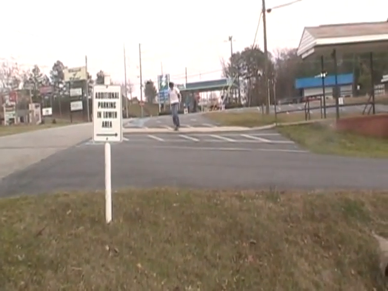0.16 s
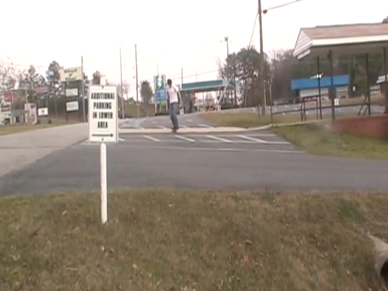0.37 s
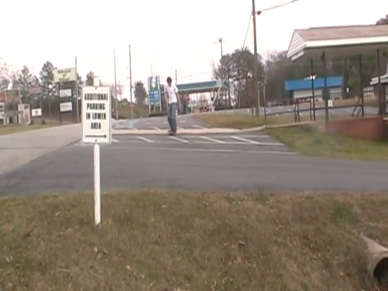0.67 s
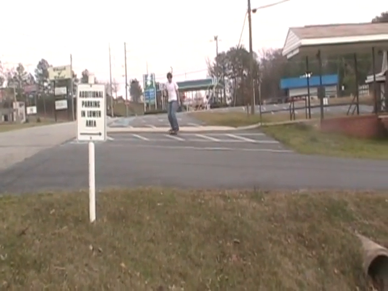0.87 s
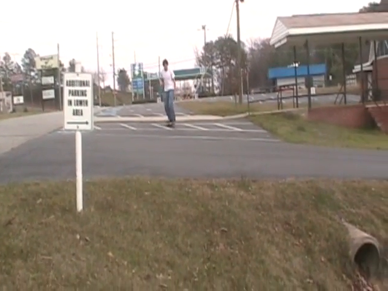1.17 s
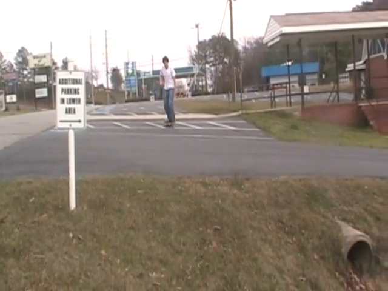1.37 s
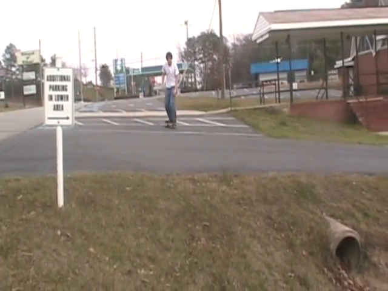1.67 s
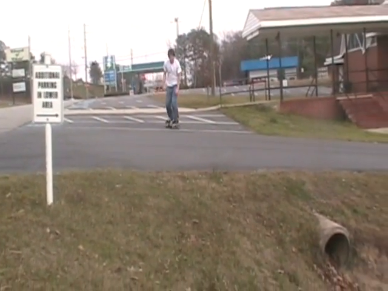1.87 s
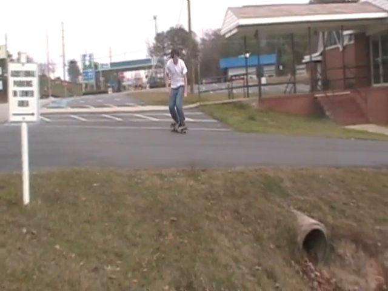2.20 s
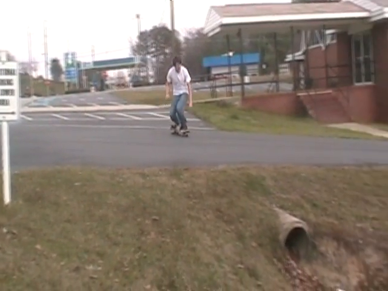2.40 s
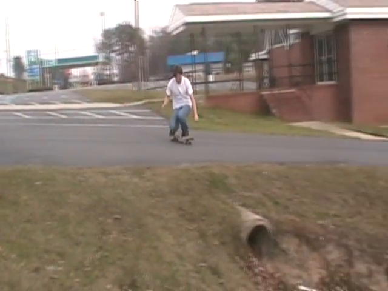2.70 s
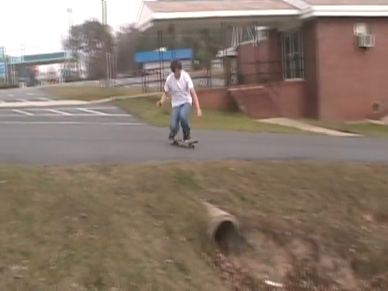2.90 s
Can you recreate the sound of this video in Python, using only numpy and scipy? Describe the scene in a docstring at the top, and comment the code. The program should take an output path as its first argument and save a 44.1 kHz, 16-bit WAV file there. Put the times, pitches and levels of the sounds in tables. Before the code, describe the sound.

A skateboard approaches across an open car park under constant low, lumpy wind buffeting. Sharp clacks come at 0.3 and 0.5 seconds, with a hollow deck knock near 0.56; a faint bird chirps at 0.2. Gritty, metallic rattle swells around 0.8, with treble hiss. Road rumble peaks near 1.8, sparse clacks follow around 1.5, 2.15 and 2.6, and a wavering growl settles lower. A distant engine drones faintly, fading late.

```python
"""In a car park, a skateboard rolls towards the listener: wheels on grit rasp and hiss, then growl on asphalt.
The growl, grit ringing two narrow resonances, shifts between them and settles on the lower as the board turns.
Joints and stones clack as noise bursts through the board's ringing modes, and axle drops knock the deck.
Wind, as lumpy shaped noise, buffets both microphone ports; a far bird chirps once as a gliding sine,
and a distant engine drones underneath as one wavering sine."""
import sys
import numpy as np
from scipy import signal
from scipy.fft import rfft, irfft
from scipy.io import wavfile
from scipy.ndimage import uniform_filter1d

SR = 44100
rng = np.random.default_rng(int(sys.argv[2]) if len(sys.argv) > 2 else 0)


def pcm_store(signal):
    """Save signal as 16-bit PCM."""
    levels = np.round(np.clip(np.atleast_2d(signal), -1, 1) * 32767)
    wavfile.write(sys.argv[1], SR, levels.astype(np.int16).T)


N = 134505
TIME = np.arange(N) / SR  # s
FREQS = np.maximum(np.arange(N // 2 + 1) * SR / N, 1)  # Hz

# grit under the wheels: impacts per second, spread of their sizes in dB
FINE_GRAINS_PER_S, COARSE_GRAINS_PER_S, GRAIN_SPREAD_DB = 3000, 2400, 2


def from_db(db):
    """Decibels to gain."""
    return 10 ** (np.asarray(db) / 20)


def rms_one(x):
    """Scale to unit power."""
    return x / np.sqrt(np.mean(x ** 2) + 1e-20)


def in_time(rows):
    """Each column of a curve, per sample."""
    s, *columns = np.transpose(rows)
    return [np.interp(TIME, s, c) for c in columns]


def in_frequency(rows):
    """Each column of a spectrum, per frequency bin, interpolated along log frequency."""
    hz, *columns = np.transpose(rows)
    return [np.interp(np.log(FREQS), np.log(hz), c) for c in columns]


def colour(x, spectrum, tilt_db=0):
    """Give a signal a spectrum and a tilt in dB per octave; unit power."""
    gain_db = in_frequency(spectrum)[0] + tilt_db * np.log2(FREQS)
    return rms_one(irfft(rfft(x) * from_db(gain_db), N))


def drift(rate_hz):
    """Slow random motion with spread 1, weakening above the given rate."""
    weights = (FREQS > 2) / (1 + (FREQS / rate_hz) ** 2)
    return rms_one(irfft(rfft(rng.standard_normal(N)) * weights, N))


def grit(per_s, spread_db):
    """Random tiny impacts of uneven size and either sign."""
    sizes = from_db(spread_db * np.minimum(rng.exponential(1, N), 4))
    return sizes * rng.choice([-1, 1], N) * (rng.random(N) < per_s / SR)


def resonate(x, hz, width_hz):
    """Two-pole resonance whose centre may move, retuned every 256 samples; gain 1 on top."""
    out, state, size = np.zeros(N), np.zeros(2), 256
    r, hz = np.exp(-np.pi * width_hz / SR), np.broadcast_to(hz, N)
    for i in range(0, N, size):
        poles = [1, -2 * r * np.cos(2 * np.pi * hz[i] / SR), r * r]
        out[i:i + size], state = signal.lfilter([1, 0, -1], poles, x[i:i + size], zi=state)
    return out * (1 - r * r) / 2


def rolling():
    """Grit under the wheels: rasp and hiss share the jolts of uneven contact, over road rumble and growl."""
    # growl of the wheels on asphalt: t/s, upper resonance level/dB, lower resonance level/dB
    growl_levels = [(0, -55, -56), (.5, -44.5, -43), (.68, -61, -44.5), (1.05, -62, -42), (1.33, -57, -52),
                    (1.6, -50, -51), (1.98, -43.5, -47.5), (2.15, -35.5, -44.5), (2.24, -41, -57),
                    (2.37, -38, -47), (2.53, -42.5, -49), (2.6, -48.5, -35), (2.73, -50.5, -42.5),
                    (2.84, -41.5, -35), (2.95, -45.5, -39.5), (3.05, -46, -37)]
    upper_db, lower_db = in_time(growl_levels)
    jolts_db = 1.34 * drift(41)
    wheels = rasp() * from_db(jolts_db) + hiss() * from_db(0.93 * jolts_db) + road()
    return wheels + growl(667.7, upper_db) + growl(523.7, lower_db)


def rasp():
    """Coarse grit rattles the wheels and rings through the board."""
    # wheels rattling on the grit, before the overall lift: t/s, level/dB
    rasp_level = [(0, -51), (.22, -50), (.44, -49), (.51, -43), (.65, -46), (.85, -41.5), (1.05, -44.5),
                  (1.28, -48.5), (1.45, -47), (1.57, -46), (1.72, -48.5), (1.95, -46), (2.2, -49),
                  (2.48, -49.5), (2.6, -48), (2.75, -50.5), (3.05, -49.5)]
    # colour of the rattle before the board rings: f/Hz, relative level/dB
    rasp_spectrum = [(300, 1), (500, 3.5), (750, -8.5), (1300, 0.5), (1800, -2.5), (2400, -2), (3400, -5.5),
                     (4200, -5.5), (6000, -7.5), (8000, -12.5), (12000, -35)]
    rattle = colour(grit(COARSE_GRAINS_PER_S, GRAIN_SPREAD_DB), rasp_spectrum)
    lift_db = 3
    return rms_one(board(rattle)) * from_db(lift_db + in_time(rasp_level)[0])


def hiss():
    """Dense grains, 7000 per second, blur into a treble hiss."""
    # treble hiss, before the overall lift: t/s, level/dB
    hiss_level = [(0, -88), (.09, -61), (.2, -55), (.45, -56), (.55, -51), (.67, -57), (.74, -45.5),
                  (.85, -46.5), (1.1, -47), (1.3, -51), (1.5, -49.5), (1.9, -46.5), (2.17, -45.5),
                  (2.42, -47), (2.6, -45), (2.75, -46.5), (3.05, -46)]
    # colour of the hiss: f/Hz, relative level/dB
    hiss_spectrum = [(1500, -18), (3000, -1), (5000, -1), (7000, 3.5), (9000, 3.5), (11000, 5),
                     (13000, -21.5)]
    lift_db = 1
    return colour(grit(7000, 3.5), hiss_spectrum) * from_db(lift_db + in_time(hiss_level)[0])


def road():
    """Fine grit, weighted to the lows and mids, makes the broad rumble of the road surface."""
    # road rumble: t/s, level/dB
    road_level = [(0, -48.5), (.3, -43.5), (.7, -53), (1.3, -46), (1.5, -42), (1.8, -37.5), (2.05, -40),
                  (2.17, -38), (2.3, -40.5), (2.7, -44.5), (3.05, -45)]
    # colour of the rumble: f/Hz, relative level/dB
    road_spectrum = [(100, -2), (170, -1), (280, 2.5), (420, 0), (750, 2), (950, -3), (1250, -3.5),
                     (1600, -9), (3000, -19.5), (6000, -25)]
    rumble = colour(grit(FINE_GRAINS_PER_S, GRAIN_SPREAD_DB), road_spectrum)
    return rumble * from_db(in_time(road_level)[0])


def growl(centre_hz, db):
    """Grit drives one narrow resonance that wanders a little in pitch and holds a fairly even level."""
    width_hz, wander_hz, wander_rate_hz = 48, 15, 12
    hz = centre_hz + wander_hz * drift(wander_rate_hz)
    ring = resonate(grit(FINE_GRAINS_PER_S, GRAIN_SPREAD_DB), hz, width_hz)
    ring = resonate(ring, hz, width_hz * 5)
    power = uniform_filter1d(rms_one(ring) ** 2, size=1500)  # over about 34 ms
    return rms_one(ring / np.sqrt(power + 0.092)) * from_db(0.5 + db)


def board(x):
    """Contact noise plus the ringing it excites in trucks and deck."""
    # ringing of trucks and deck, before a 3 dB cut: f/Hz, width/Hz, level/dB
    board_modes = [(500, 52, -6), (870, 160, 3.5), (1190, 180, 0), (1730, 77, 1.5), (2066, 120, 4.5),
                   (2360, 47, -7), (2630, 86, -5), (3210, 59, -7), (3500, 200, -2), (5230, 410, -8)]
    return x + sum(from_db(db - 3) * resonate(x, hz, width) for hz, width, db in board_modes)


def clacks():
    """Each strike is a hard crack and a short crunch with a rattling tail, rung through the board."""
    # wheels strike joints and stones, before the overall trim:
    # t/s, level/dB, treble tilt/dB per octave, hardness of the contact/dB
    strikes = [(0.102, -44, 2, -5), (0.273, -36.5, 3.5, -10), (0.2806, -28, -2, -18), (0.355, -44, -8, -14),
               (0.468, -32, 3, -3), (0.4711, -25.5, 3, -4), (0.4737, -39, -6, -10), (0.556, -33, 2, -22),
               (0.561, -26, -3, -22), (.576, -29, -4.5, -11), (0.754, -33, 4, -7), (0.824, -33, 3.5, -8),
               (.97, -34, -6, -7), (1.513, -33.5, 6.5, -11), (1.551, -35, 2.5, -8), (1.613, -35, 3, -6),
               (2.127, -30.5, -2, -14), (2.148, -36, -3, -11), (2.163, -33, 3, -14), (2.171, -32, -6, -12),
               (2.576, -33.5, -2, -6), (2.827, -36, -5.5, -4)]
    # colour of the crunch before its tilt: f/Hz, relative level/dB
    crunch_spectrum = [(150, -14), (500, 9), (900, 0.5), (1500, -2), (2150, 0), (3000, 0), (4200, -9),
                       (6000, -6), (8000, -13.5), (12000, -13.5)]
    # colour of the instant of contact: f/Hz, relative level/dB
    crack_spectrum = [(500, 16), (2000, -34), (5500, 6), (8000, 15), (12000, -22)]
    # tilt of the dullest and of the brightest crunch: dB per octave
    crunch_tilts = (-3.5, 2)
    crunch_decay_s, tail_decay_s, tail_db = 0.0029, 0.097, -13.5
    crack_decay_s, crack_db = 0.00037, 5.5
    noises = rng.standard_normal((2, N))
    dull, bright = (colour(noise, crunch_spectrum, tilt) for noise, tilt in zip(noises, crunch_tilts))
    crack = colour(rng.standard_normal(N), crack_spectrum)
    out = np.zeros(N)
    for s, db, tilt_db, hard_db in strikes:
        start = int(s * SR)
        span = slice(start, start + SR // 5)
        age = TIME[span] - TIME[span][0]
        share = np.interp(tilt_db, crunch_tilts, (0, 1))  # of the bright crunch
        crunch = np.sqrt(1 - share) * dull[span] + np.sqrt(share) * bright[span]
        envelope = np.exp(-age / crunch_decay_s) + from_db(tail_db) * np.exp(-age / tail_decay_s)
        contact = crack[span] * from_db(crack_db + hard_db) * np.exp(-age / crack_decay_s)
        out[span] += from_db(db) * (crunch * envelope + contact)
    return from_db(-2) * board(out)


def knocks():
    """The axles drop into joints; each blow sets the deck's few broad modes ringing, quickly damped."""
    # axle drops: t/s, level/dB
    drops = [(.2808, -34), (.354, -33), (.4722, -28), (.5594, -18), (.5646, -19)]
    # the deck's hollow knock: f/Hz, width/Hz, level/dB
    deck_modes = [(515, 130, -2.5), (870, 370, 0), (1530, 310, -5), (2040, 235, 0)]
    s, db = np.transpose(drops)
    blows = np.zeros(N)
    blows[(s * SR).astype(int)] = from_db(db)
    out = np.zeros(N)
    for k, (hz, width, mode_db) in enumerate(deck_modes):
        to_unit_peak = SR / (2 * np.pi * width)
        ring = resonate(blows + 1e-18, hz, width) * to_unit_peak
        out += (-1) ** k * from_db(mode_db) * ring  # neighbouring modes have opposite sign
    return out


def trucks():
    """Coarse grit on the rough stretch sets the metal trucks ringing; the ring wanders, swells and fades."""
    # ringing of the trucks, about wandering centres: f/Hz, width/Hz, level/dB
    truck_modes = [(2354, 175, 1), (2740, 160, -4.5), (3170, 135, -2)]
    peak_s, swell_s, level_db, wander_hz = .82, 0.35, -45.5, 45
    shake = grit(COARSE_GRAINS_PER_S, GRAIN_SPREAD_DB)
    ring = np.zeros(N)
    for centre_hz, width, db in truck_modes:
        hz = centre_hz + wander_hz * drift(6)
        ring += from_db(db) * resonate(resonate(shake, hz, width), hz, width * 5)
    swell = np.exp(-((TIME - peak_s) / swell_s) ** 2)
    return rms_one(ring) * from_db(level_db) * swell


def whine():
    """A thin ring, perhaps a bearing: noise through a narrow resonance, fading out early on."""
    hz, width_hz, level_db, end_s = 2155, 51, -56, .42
    ring = resonate(resonate(rng.standard_normal(N), hz, width_hz), hz, width_hz * 10)
    fade = np.clip((end_s - TIME) * 10, 0, 1)  # over the last 0.1 s
    return rms_one(ring) * from_db(level_db) * fade


def at_ports(direct, scattered):
    """Direct sound reaches the right port first; scatter from ground and walls differs between the ports."""
    # phase between the microphone ports: f/Hz, left lead/radians
    port_lead = [(100, 0), (700, -.15), (1000, -.33), (2300, -.42), (3800, -.78), (5200, -.93),
                 (6500, -1.4), (8000, -2.0), (10000, -2.6), (11700, -3.1)]
    # how the two ports hear the board: f/Hz, left minus right level/dB, diffuse share level/dB
    port_response = [(100, -4.5, -25), (1010, -1, -10.5), (2340, 0, -11), (5170, -1, -6.5),
                     (8240, -2, -12.5), (11300, -1, -9.5)]
    lead, = in_frequency(port_lead)
    balance_db, scatter_db = in_frequency(port_response)
    side = np.array([[1], [-1]])  # left, right
    heard = rfft(direct) * np.exp(.5j * side * lead) + rfft(scattered) * from_db(scatter_db)
    return irfft(heard * from_db(side * balance_db / 2), N)


def wind():
    """Lumpy turbulence, partly common to both ports; a brighter buffeting grows faster than the gusts."""
    # gusts at the left port, before its trim: t/s, level/dB
    gust_left = [(0, -32), (.07, -43), (.14, -34), (.34, -33.5), (.41, -38.5), (.58, -33), (.75, -33),
                 (1.0, -35), (1.27, -41.5), (1.4, -31.5), (1.72, -33), (1.95, -31), (2.18, -36.5),
                 (2.26, -39.5), (2.38, -31), (2.502, -33), (2.599, -32.5), (3.05, -36.5)]
    # gusts at the right port, before its trim: t/s, level/dB
    gust_right = [(0, -28), (.13, -34.5), (.27, -27), (.32, -27), (.4, -29.5), (.52, -30.5), (.59, -30.5),
                  (.66, -29.5), (0.961, -27), (1.03, -28), (1.08, -30.5), (1.13, -29), (1.23, -30),
                  (1.34, -32), (1.48, -28), (1.601, -25.5), (1.72, -30.5), (1.87, -27.5), (2.101, -30.5),
                  (2.19, -29.5), (2.27, -28), (2.55, -28.5), (2.72, -28.5), (2.9, -27), (3.05, -30.5)]
    # trim of each port, left then right: level/dB, tilt/dB per octave
    port_trims = [(-0.43, -1.4), (-2.3, 0.73)]
    # pressure common to both ports: f/Hz, level/dB
    shared_wind = [(25, -19), (130, -8), (260, -9), (1000, -20)]
    # colour of the turbulence before the tilt: f/Hz, relative level/dB
    wind_spectrum = [(20, -45), (33, -38), (50, -11.5), (80, -3.5), (130, -0.5), (200, -1.5), (300, -3.5),
                     (450, -16.5), (700, -19), (1200, -28), (2500, -36.5), (6000, -66)]
    # colour of the buffeting: f/Hz, relative level/dB
    buffet_spectrum = [(100, -28), (200, -8.5), (300, 3.5), (450, 3.5), (700, -22.5), (1200, -13.5),
                       (2500, -25), (6000, -62)]
    buffet_db, strong_gust_db = -8.5, -29  # buffeting relative to the gust, when the gust is this strong
    buffet_growth = 0.5  # extra dB per dB of gust
    left, right, common = (rng.standard_normal(N) * from_db(2 * drift(110)) for _ in range(3))
    common = irfft(rfft(common) * from_db(in_frequency(shared_wind)[0]), N)
    out = []
    for own, gust, (db, tilt_db) in zip((left, right), (gust_left, gust_right), port_trims):
        gust_db, = in_time(gust)
        turbulence = colour(own + common, wind_spectrum, tilt_db)
        buffet = colour(rng.standard_normal(N) * from_db(5.9 * drift(31)), buffet_spectrum)
        buffet = buffet * from_db(buffet_db + buffet_growth * (gust_db - strong_gust_db))
        out.append((turbulence + buffet) * from_db(db + gust_db))
    return np.array(out)


def slaps():
    """Single eddies swell and die at the ports as dull puffs of noise."""
    # eddies slapping the ports: t/s, length/s, level/dB, left minus right level/dB
    eddies = [(0.07, 0.03, -33.5, 2), (0.313, 0.019, -36, -19), (0.349, 0.016, -26, -2.5),
              (0.47, 0.0099, -29, 10), (0.583, 0.029, -32.5, 1), (1.01, 0.019, -28.5, 1),
              (1.028, 0.022, -29, -8), (1.105, 0.016, -33, -12), (1.142, 0.025, -28, -8),
              (1.192, 0.026, -31, -15), (1.227, 0.018, -29.5, -10.5), (1.265, 0.016, -32, -7),
              (1.523, 0.011, -26, -4), (1.612, 0.026, -35, -5), (1.896, .016, -32, -5),
              (2.178, 0.036, -28, -6), (2.213, .03, -36, -11)]
    # colour of a puff: f/Hz, relative level/dB
    puff_spectrum = [(80, -37), (170, 4.5), (280, 2), (430, -1), (650, -15), (1200, -24.5), (4000, -49)]
    out = np.zeros((2, N))
    puffs = np.array([colour(noise, puff_spectrum) for noise in rng.standard_normal((2, N))])
    for s, length_s, db, pan_db in eddies:
        swell = np.exp(-2 * ((TIME - s) / length_s) ** 2)
        strength = np.sqrt(puffs ** 2 @ swell ** 2 / np.sum(swell ** 2))  # evens out the noise's own level
        port_db = db + np.array([.5, -.5]) * pan_db
        out += puffs * swell * (from_db(port_db) / strength)[:, None]
    return out


def bird():
    """A far bird's single chirp: a thin sine whistle that rises and falls."""
    # the chirp: t/s, f/Hz, level/dB
    chirp = [(.185, 3600, -72), (.2, 3950, -56), (.218, 4650, -51), (.228, 4200, -60), (.24, 3700, -70)]
    hz, db = in_time(chirp)
    whistle = np.sin(2 * np.pi * np.cumsum(hz) / SR)
    return whistle * from_db(db) * (TIME > chirp[0][0]) * (TIME < chirp[-1][0])


def engine():
    """One low sine note from far traffic, wavering in pitch and level."""
    # the distant engine, before its wavers and lift: t/s, f/Hz, level/dB
    drone = [(0, 136.5, -48.5), (.25, 136.3, -40.5), (.42, 139.4, -40), (.58, 127.5, -31.5),
             (.75, 133, -44.5), (1.1, 132.6, -33.5), (1.22, 127.6, -46), (1.35, 126.3, -42),
             (1.6, 136, -38.5), (1.8, 136.9, -48), (2.15, 140, -40), (2.4, 134.3, -54), (3.05, 135, -74)]
    hz, db = in_time(drone)
    waver_hz = 5 * drift(45)
    phase = 2 * np.pi * np.cumsum(hz + waver_hz) / SR
    waver_db = 2.5 * drift(24)
    return np.sqrt(2) * np.sin(phase) * from_db(db + 0.5 + waver_db)


def scene():
    """Board and bird as the ports hear them, with wind at the ports and the far engine equal in both."""
    # one direct take of the rolling board, and an independent one scattered to each port
    direct, *scattered = (rolling() + clacks() + whine() for _ in range(3))
    direct = direct + knocks() + trucks() + bird()
    return at_ports(direct, np.array(scattered)) + wind() + slaps() + engine()


def record(dry):
    """The recorder cuts the top steeply above 11.8 kHz."""
    steep_cut = signal.ellip(10, .2, 80, 11800, fs=SR, output="sos")  # ripple 0.2 dB, floor -80 dB
    return signal.sosfilt(steep_cut, dry)


dry = scene()
out = record(dry)
pcm_store(out)
```